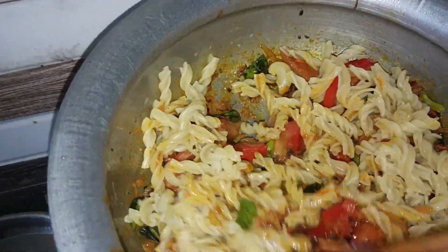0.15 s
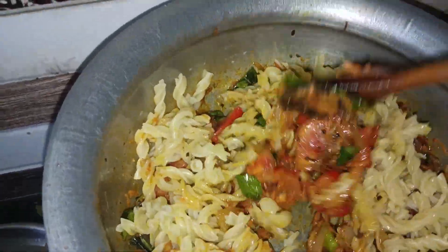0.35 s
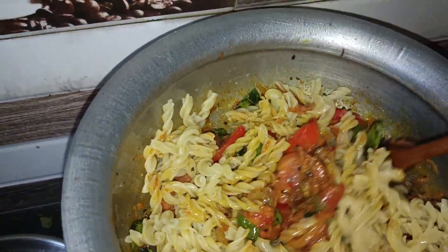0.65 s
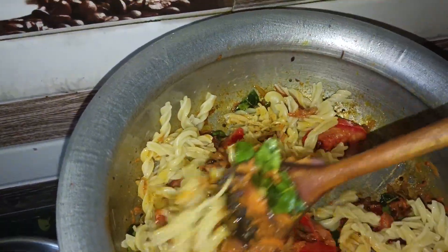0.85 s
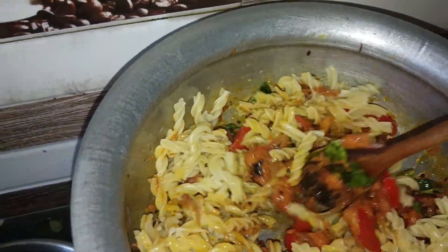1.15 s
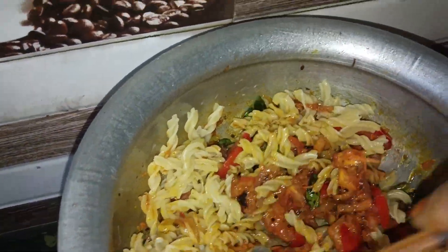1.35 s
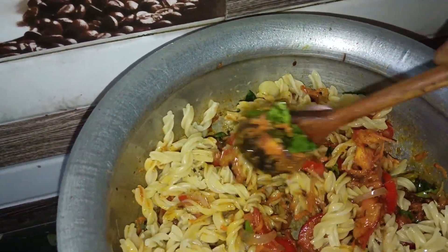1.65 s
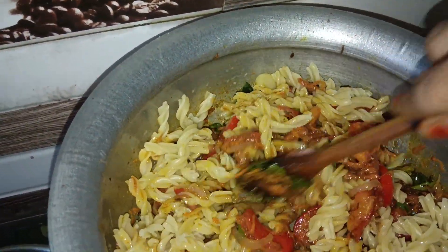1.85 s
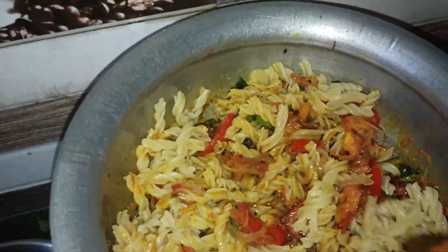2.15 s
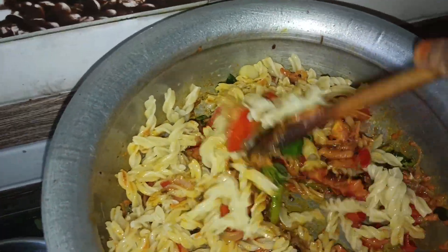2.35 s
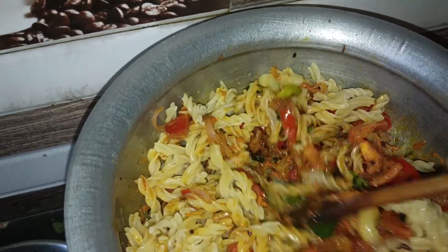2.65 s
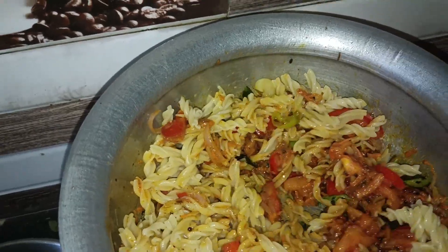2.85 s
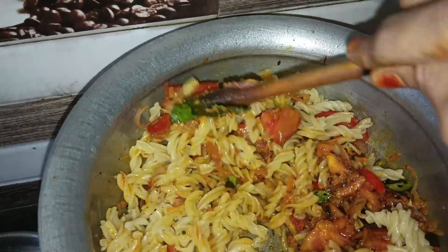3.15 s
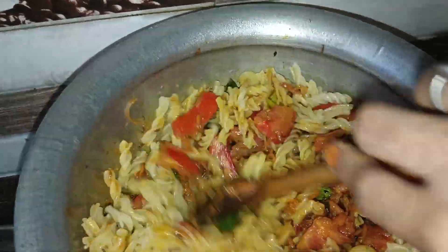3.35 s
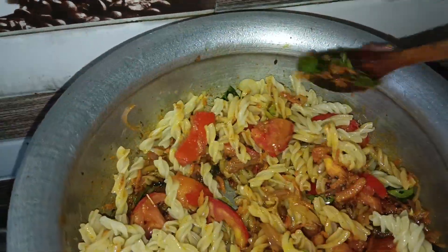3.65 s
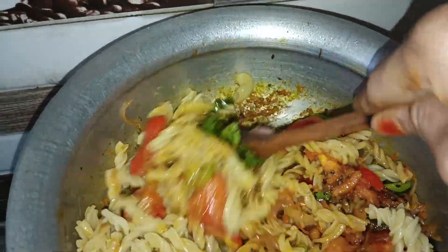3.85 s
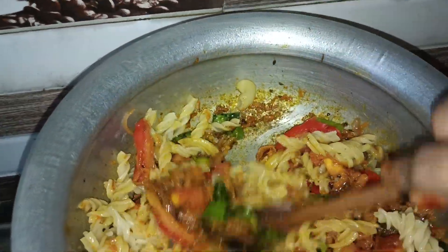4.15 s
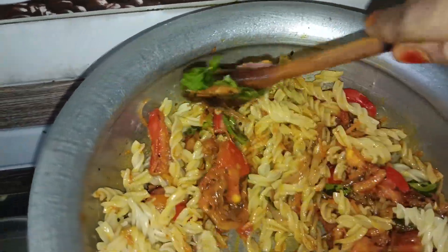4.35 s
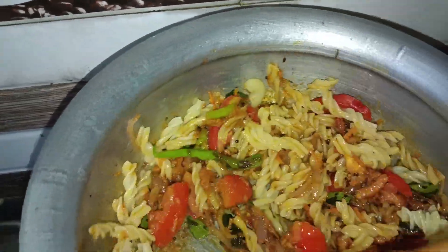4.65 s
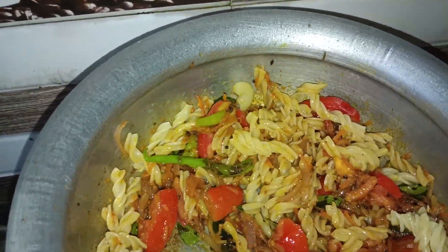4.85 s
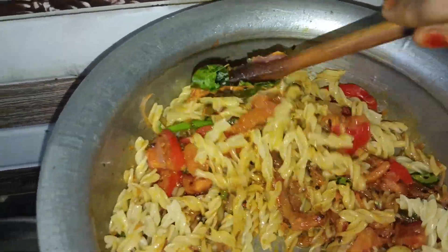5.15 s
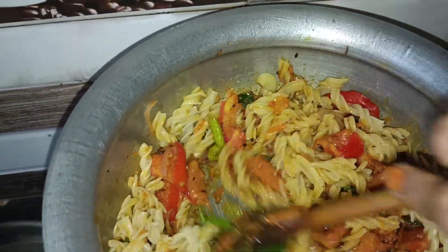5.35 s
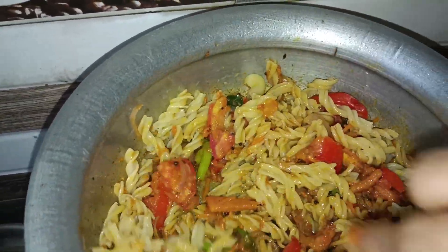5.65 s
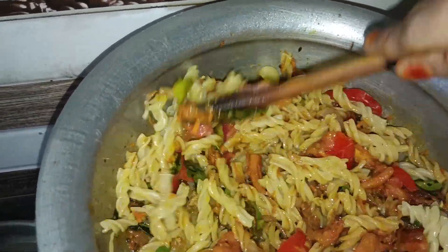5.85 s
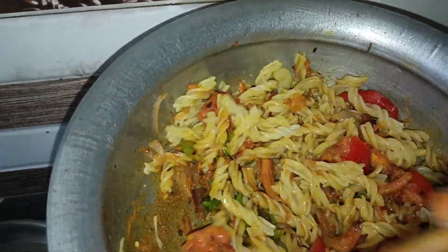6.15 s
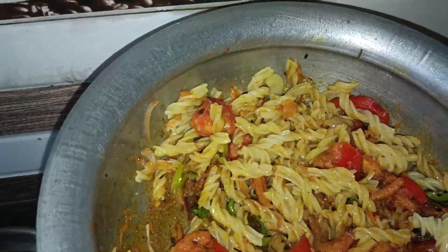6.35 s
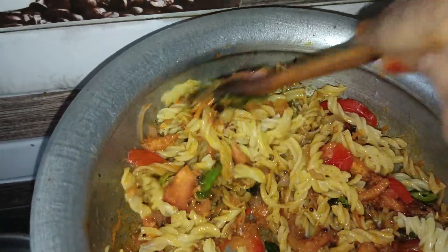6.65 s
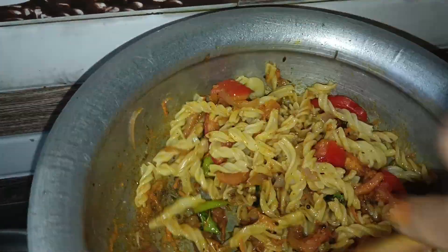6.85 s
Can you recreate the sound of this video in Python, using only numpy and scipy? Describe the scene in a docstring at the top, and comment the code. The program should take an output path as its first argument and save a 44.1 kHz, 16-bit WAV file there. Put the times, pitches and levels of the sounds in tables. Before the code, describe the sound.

Continuous bright, crackling sizzle fills a close stereo phone pickup, growing slightly as pasta is stirred in an aluminium pan. Short rough scrapes and dull, food-damped knocks follow the spoon's uneven rhythm, becoming firmer after the first second, some edged with a woody crack. One clear metallic ting sounds midway, towards the right. Low handling-like rumble rises late, over a very faint kitchen background.

```python
"""A wooden spoon stirs pasta in a wide aluminium pan on a stove, heard by a two-port phone held close.
From the start the spoon drags on the pan while fat and sauce sizzle and spit; each stroke swells the sizzle.
Soft knocks on the food-damped metal come first, then harder ones, some with a dry snap of wood.
Halfway through the spoon once strikes the bare rim. A low rumble comes and goes, mostly louder towards the end.
Noise and clicks make the sizzle and the drag; short fading tones make the knocks, snaps and rim."""
import sys
import numpy as np
from scipy import signal
from scipy.fft import rfft, irfft
from scipy.io import wavfile
from scipy.ndimage import uniform_filter1d

SR = 44100
rng = np.random.default_rng(int(sys.argv[2]) if len(sys.argv) > 2 else 0)


def master(y):
    """Save y as 16-bit WAV."""
    cut = np.clip(np.atleast_2d(y).T, -1, 1)
    pcm = np.round(cut * 32767)  # scale
    wavfile.write(sys.argv[1], SR, pcm.astype(np.int16))


N = 308700  # samples, 7 s
T = np.arange(N) / SR  # time in seconds
F = np.maximum(np.fft.rfftfreq(N, 1 / SR), 1)  # frequencies in Hz

# Tone colour of frying. Each row: frequency in Hz, relative strength in dB per Hz.
FRYING_COLOUR = [(600, -31), (1030, -11.5), (1150, -3.5), (1290, 2), (1700, -8), (1840, -4.5), (4020, -2),
                 (5440, -2.5), (6410, -9.5), (7550, -1.5), (8660, -5.5), (9400, -13.5), (10300, -8),
                 (11500, -20), (15800, -25.5)]
# Tones of the pan body under food. Each row: pitch in Hz, relative level in dB, time to fade by 60 dB in seconds.
PAN_MODES = [(159, 2, 0.12), (243, -13.5, 0.41), (261, -3, 0.45), (317.5, 12, 0.063), (337.2, 7, 0.14),
             (473, -0.5, 0.26), (575, 1.5, 0.024), (730.6, -9, 0.14), (769, 4, 0.024), (888, 1.5, 0.076),
             (982, 1, 0.027), (1110, -26, 0.0053), (1287, 8.5, 0.016), (1463, 3.5, 0.013)]


def undb(db):
    """Gain of a level in dB."""
    return 10 ** (np.asarray(db) / 20)


def unit(x):
    """Scale a sound to an rms of 1."""
    return x / np.sqrt(np.mean(x ** 2))


def over_hz(points):
    """Join points along a logarithmic frequency axis."""
    hz, value = np.transpose(points)
    return np.interp(np.log(F), np.log(hz), value)


def shape(x, gain):
    """Filter a sound by a gain for each frequency."""
    return irfft(rfft(x) * gain, N)


def ring(x, hz, t60):
    """One tone that x sets ringing; it fades by 60 dB in t60 seconds, or 5 ms if that is longer."""
    pole = np.exp(2j * np.pi * hz / SR - np.log(1000) / (max(t60, .005) * SR))
    return signal.lfilter([1], [1, -pole], x).imag


def walk(rate):
    """Random levels, each held for 1 / rate seconds, then smoothed and scaled to rms 1."""
    k = int(SR / rate)
    steps = np.repeat(rng.standard_normal(N // k + 1), k)
    smooth = uniform_filter1d(uniform_filter1d(steps, k), k)
    return unit(smooth[:N])


def clicks(rate, spread_db):
    """Random clicks, about `rate` a second: many small and a few large."""
    when, sign, size = rng.random(N), rng.standard_normal(N), rng.exponential(1, N)
    loudness = undb(spread_db * np.minimum(size, 4.5))
    return unit((when < rate / SR) * sign * loudness)


def pair(make, likeness):
    """Left and right sounds from two random draws, alike by the given correlation."""
    c = np.clip(likeness, 0, 1)
    mid = shape(make(), np.sqrt(1 + c))
    side = shape(make(), np.sqrt(1 - c))
    return np.array([mid + side, mid - side]) / 2


def aside(x, lag_s, left_db=0):
    """Two channels of a sound from another direction: the left one shifted in time and level."""
    delay = np.exp(-2j * np.pi * F * np.array([[lag_s], [0]]))
    return shape(x, undb([[left_db], [0]]) * delay)


def kitchen():
    """The faint background of the room is steady noise, much alike on both sides."""
    # Each row: frequency in Hz, relative strength in dB per Hz.
    room_colour = [(25, 5), (45, -20), (85, 13), (170, -4), (400, -4), (900, -23), (1300, -38)]
    air = pair(lambda: rng.standard_normal(N), 0.74)
    return undb(-66) * unit(shape(air, undb(over_hz(room_colour))))


def rumble():
    """Noise rings in low narrow resonances, and its level comes and goes."""
    # Each row: time in seconds, level in dB.
    rumble_levels = [(0.0, -76.5), (0.11, -87), (0.21, -50), (0.54, -71), (1.38, -46.5), (2.46, -69),
                     (3.67, -66), (3.76, -52), (4.42, -46.5), (4.52, -71), (4.6, -39), (4.74, -51),
                     (5.52, -41), (5.54, -37.5), (6.1, -39.5), (6.71, -59.5), (6.76, -43), (7.0, -41)]
    # Each row: pitch in Hz, relative level in dB, time to fade by 60 dB in seconds.
    low_modes = [(72.3, -3, 0.53), (93.3, -4, 0.25), (115.4, -20.5, .2)]
    hum = sum(undb(db) * unit(ring(rng.standard_normal(N), hz, t60)) for hz, db, t60 in low_modes)
    hum = shape(hum, 1 / ((1 + (55 / F) ** 6) * (1 + (F / 130) ** 6)))  # keep about 55 to 130 Hz
    s, level_db = np.transpose(rumble_levels)
    return undb(np.interp(T, s, level_db)) * unit(hum)


def swell():
    """Each stroke bares the hot floor: extra dB of sizzle ramp up to its peak and down again."""
    # Each row: time of the peak in seconds, rise in seconds, fall in seconds (both at least 0.02), swell in dB.
    stroke_swells = [(0.25, 0.42, 0.26, 6), (0.68, 0.33, .16, 5.5), (1.18, 0.39, 0.097, 6.5),
                     (1.53, 0.27, 0.24, 5.5), (1.8, 0.064, 0.9, 1), (2.25, 0.042, 0.18, 5),
                     (2.67, .24, 0.17, 6.5), (2.96, 0.042, 0.21, 4), (3.44, 0.22, 0.087, 5),
                     (3.84, 0.23, 0.077, 4.5), (4.19, 0.16, 0.28, 6.5), (4.662, 0.29, 0.2, 5),
                     (4.94, 0.08, .28, 6.5), (5.37, 0.22, 0.12, 6.5), (6.05, 1, 0.53, 3),
                     (6.45, 0.23, 0.14, 7), (6.83, 0.28, .17, 5)]
    s, rise, fall, db = np.transpose(stroke_swells)[:, :, None]
    ramp = 1 - np.where(T < s, (s - T) / np.maximum(rise, .02), (T - s) / np.maximum(fall, .02))
    return np.max(db * np.clip(ramp, 0, 1), axis=0)  # where strokes overlap, the larger wins


def sizzle():
    """Steam bubbles burst densely, the sharpest ones bright; separate bands of pitch flicker on their own."""
    # Each row: frequency in Hz, left-right correlation.
    ear_likeness = [(300, .9), (1000, 0.48), (3000, 0.15)]
    extra_db = swell()
    level_db = -30.5 + 0.3846 * T + extra_db  # grows by 0.3846 dB a second as the food is spread
    fizz_db = -41 + 1.85 * extra_db  # the low fizz swells 1.85 times as far in dB
    bright = F / (F + 12000)

    def bubbles():
        """Noise for the many small bubbles, clicks for the sharp ones."""
        return rng.standard_normal(N) + shape(1.13 * clicks(900, spread_db=5.5), bright)

    pops = shape(pair(bubbles, over_hz(ear_likeness)), undb(over_hz(FRYING_COLOUR)))
    edges = [1, 2200, 3600, 6200, 9400, SR]  # Hz
    shared = walk(18)
    bands = []
    for low_hz, high_hz in zip(edges, edges[1:]):
        flicker_db = 0.57 * shared + 1.18 * walk(30)
        bands.append(shape(pops, (F >= low_hz) & (F < high_hz)) * undb(flicker_db))
    return unit(sum(bands[1:])) * undb(level_db) + unit(bands[0]) * undb(fizz_db)


def spits():
    """Each spit of fat is a millisecond burst of bright noise, strongest where the ports resonate."""
    # The loudest spits. Each row: start in seconds, peak level in dB before colouring.
    fat_spits = [(0.1454, -19), (0.16, -11), (0.2104, -8), (0.7941, -9), (0.806, -7), (0.819, -8.5),
                 (0.8794, -13), (1.1674, -26), (1.2979, -11), (1.642, -6), (1.905, -8), (2.025, -8),
                 (2.424, -9.5), (3.0714, -21), (3.1253, -28), (3.34, -4), (3.826, -6), (3.8856, -20),
                 (4.2963, -7.5), (4.662, -4), (4.778, -7), (5.2714, -23), (5.972, -5)]
    length = 300  # samples
    out, t = np.zeros((2, N + length)), np.arange(length) / SR
    for (s, peak_db), noise in zip(fat_spits, rng.standard_normal((len(fat_spits), 2, length))):
        burst = noise * t * np.exp(-t / 0.00063)
        peak = np.sqrt(np.max(np.mean(burst ** 2, axis=0)))
        start = int(s * SR)
        out[:, start:start + length] += undb(peak_db) * burst / peak
    colour = undb(0.74 * over_hz(FRYING_COLOUR) + 4.5)
    return shape(out[:, :N], colour / np.sqrt(1 + (6500 / F) ** 8))  # mostly above 6500 Hz


def contact(column, fade_db_per_s):
    """How loudly the spoon drags: each drag rises, holds, then fades faster and faster as the spoon lifts."""
    # Each row: time of full contact in seconds, rise in seconds (at least 0.003), hold in seconds,
    # level of the low tones in dB, level of the middle tones in dB.
    spoon_drags = [(0.0, .01, 0.047, -42.5, -42), (.269, 0.039, 0.0033, -61, -36),
                   (0.335, 0.0037, 0.031, -44, -47), (0.529, .008, 0.074, -45, -45),
                   (0.686, 0.023, 0.0024, -40.5, -34.5), (1.044, 0.022, 0.029, -41.5, -38),
                   (1.164, .008, 0.062, -45, -35), (1.211, 0.12, 0.022, -31, -33),
                   (1.448, 0.019, 0.036, -32.5, -30.5), (1.804, 0.013, 0.072, -30.5, -34),
                   (2.194, 0.014, 0.034, -31.5, -24.5), (2.439, .1, 0.0069, -55, -50.5),
                   (2.703, 0.11, 0, -30, -29.5), (2.96, 0.082, 0.073, -78, -55),
                   (3.043, .02, 0.062, -62, -49.5), (3.293, .008, 0.072, -50, -45),
                   (3.437, 0.019, 0.041, -32.5, -31), (3.657, 0.0097, 0.0041, -34, -28.5),
                   (3.856, 0.41, 0, -43.5, -42.5), (4.294, 0.01, 0.036, -40, -42.5),
                   (4.588, 0.01, 0.085, -30, -32.5), (4.919, 0.0073, 0.051, -43, -37),
                   (5.001, 0.068, 0.085, -41.5, -45), (5.268, .008, 0.037, -39, -45),
                   (5.32, 0.084, 0, -38, -36), (5.396, .008, 0.073, -32, -31.5), (5.62, 0.24, 0, -33, -36),
                   (5.865, 0.18, 0, -39.5, -36.5), (6.047, 0.0073, 0.071, -28, -31.5),
                   (6.412, 0.0073, 0.013, -29.5, -44), (6.477, 0.14, 0.017, -32, -32.5),
                   (6.74, 0.024, 0.025, -30.5, -31.5), (6.847, 0.11, 0.046, -28.5, -31.5)]
    rise_db, lift_db_per_s2 = 30, 605
    power = np.zeros(N)
    for s, rise, hold, *db in spoon_drags:
        near = np.abs(T - s) < .5
        early = np.maximum(s - T[near], 0)
        late = np.maximum(T[near] - s - max(hold, 0), 0)
        loss_db = rise_db * early / max(rise, .003) + fade_db_per_s * late + lift_db_per_s2 * late ** 2
        power[near] += undb(db[column] - loss_db) ** 2
    return np.sqrt(power)


def even(x):
    """The hand's steady pressure evens out slow swings in level."""
    return unit(x / uniform_filter1d(x ** 2, int(.03 * SR)) ** .35)


def drag():
    """The spoon sticks and slips: clicks in uneven runs set the pan's own tones ringing."""
    slips = clicks(1500, spread_db=2.0) * undb(2.2 * walk(40))
    low = sum(undb(db) * ring(slips, hz, t60) for hz, db, t60 in PAN_MODES if hz < 540)
    # the middle tones fade sooner under the spoon than the table says
    middle = sum(undb(db) * ring(slips, hz, 0.63 * t60) for hz, db, t60 in PAN_MODES if 540 < hz < 1130)
    low = shape(low, 1 / (1 + (F / 560) ** 6))
    middle = shape(middle, 1 / (1 + (540 / F) ** 6))
    return even(low) * contact(0, fade_db_per_s=175) + even(middle) * contact(1, fade_db_per_s=226)


def strike(s, peak_db, modes):
    """A blow's tones start together, build within a fraction of a cycle and fade each at its own rate."""
    t = np.arange(int(.4 * SR)) / SR
    hz, db, t60 = np.transpose(modes)[:, :, None]
    rise = (1 - np.exp(-t * hz / 0.22)) ** 2
    fade = undb(db - 60 * t / np.clip(t60, .0005, .6))
    blow = np.sum(rise * fade * np.sin(2 * np.pi * hz * t), axis=0)
    return np.pad(blow * undb(peak_db) / np.abs(blow).max(), (int(s * SR), N))[:N]


def knocks():
    """Spoon on pan: where and how hard a blow lands sets its mix of low, middle and upper tones."""
    # Each row: start in seconds, then peak levels in dB of the low, middle and upper tones before filtering.
    spoon_knocks = [(0.328, -38.5, -54, -55), (0.5, -30, -53, -55), (0.688, -32.5, -40, -55),
                    (1.165, -24.5, -34, -50), (1.1779, -35, -34, -10), (1.197, -20.5, -18, -24),
                    (1.4442, -31, -11.5, -22), (1.8043, -14, -14.5, -11.5), (2.191, -24.5, -6.5, -35),
                    (2.6739, -33, -44, -13), (3.279, -43, -24.5, -34), (3.435, -21, -23, -23),
                    (3.656, -25, -13, -12.5), (3.701, -24.5, -46, -53), (4.307, -58, -50, -50),
                    (4.5998, -21, -17, -20), (4.6382, -32, -15, -15.5), (4.9123, -23.5, -14, -28),
                    (5.267, -38, -49, -34), (5.392, -20.5, -37, -21), (5.4618, -22, -34, -13),
                    (5.6128, -34, -36, -16.5), (6.04, -14, -17, -16), (6.059, -15, -12, -18),
                    (6.397, -18, -46, -32), (6.738, -18, -33, -41), (6.8237, -38, -13.5, -33),
                    (6.842, -17, -30, -45)]
    out, hz = np.zeros(N), np.transpose(PAN_MODES)[0]
    groups = [hz < 540, (hz >= 540) & (hz < 1130), hz >= 1130]
    chance = rng.standard_normal((len(spoon_knocks), 2, len(PAN_MODES)))
    for (s, *group_db), (place, load) in zip(spoon_knocks, chance):
        modes = np.array(PAN_MODES)
        modes[:, 0] *= 1 + 0.028 * load  # the food lies differently each time and shifts the pitches
        modes[:, 1] += 4.5 * place  # dB; the place of the blow favours some tones
        for group, peak_db in zip(groups, group_db):
            out += strike(s, peak_db, modes[group])
    return out


def cracks():
    """Dry snaps of wood in hard knocks: a pull and a push that die within a few cycles, with a brighter edge."""
    # Each row: start in seconds, peak level in dB, pitch in Hz.
    wood_snaps = [(1.1774, -11, 3600), (1.1971, -6.5, 3900), (1.4446, -18, 1480), (1.8046, -5, 1194),
                  (2.1918, -20, 1040), (2.6747, -17, 2600), (4.601, -13, 2010), (4.6362, -13, 2220),
                  (4.9129, -29, 1600), (5.46, -23, 1300), (6.040, -25, 1700)]
    cycles = 4.5  # cycles to fade by 60 dB
    out = np.zeros(N)
    for s, peak_db, hz in wood_snaps:
        body = (hz, 0, cycles / hz)
        edge = (2.4 * hz, -3, cycles / hz / 2)
        out -= strike(s, peak_db, [body, edge])
    return aside(out, lag_s=-.00009)  # reaches the left port a little sooner than the pan floor's sound


def rim():
    """One blow on the bare rim rings high and clear, on the right."""
    # Each row: pitch in Hz, relative level in dB, time to fade by 60 dB in seconds.
    rim_modes = [(1890, -4, .05), (2281, 4, .09), (2362, -5, .05), (3690, 3, 0.16), (3816, -8, 0.09),
                 (4558, -12, .09), (4793, -9, .11), (5157, -7, .13)]
    blow = strike(3.6548, -2.5, rim_modes)
    return aside(blow, lag_s=.00008, left_db=-5)  # later and weaker at the left port


def reflections(pan):
    """Close reflections: a short fading noise tail that reaches the two ports in opposite sign."""
    tail = rng.standard_normal(4000) * np.exp(-np.arange(4000) / SR / 0.015)
    tail = tail / np.sqrt(np.sum(tail ** 2))
    wet = shape(signal.fftconvolve(pan, tail)[:N], F ** 2 / (F ** 2 + 450 ** 2))  # weak below 450 Hz
    return undb(-0.5) * wet * np.array([[1], [-1]])


def scene():
    """Add all the sounds; the pan radiates little below its lowest tones."""
    pan = shape(knocks() + drag(), 1 / np.sqrt(1 + (180 / F) ** 8)) + rumble()
    spoon = pan + cracks() + rim() + reflections(pan)
    return spoon + sizzle() + spits() + kitchen()


def record(dry):
    """Ports differ in colour and the left is further off; gain control dips after loud sound; the top is cut."""
    # Each row: frequency in Hz, left minus right level in dB.
    port_balance = [(90, 0), (180, -3), (330, 0), (700, -2.5), (2500, -1.5), (5600, 0), (7500, 4.5),
                    (9200, 2), (11300, -9.5), (15000, -6)]
    half = over_hz(port_balance) / 2
    lag = np.exp(-2j * np.pi * F * np.array([[.00014], [0]]))  # seconds, left and right
    x = shape(dry, lag * undb(np.array([half, -half])))
    keep = np.exp(-1 / (0.042 * SR))  # the loudness meter forgets over 0.042 s
    loud = np.sqrt(signal.lfilter([1 - keep], [1, -keep], np.mean(x ** 2, axis=0)))
    x = x * np.minimum(1, undb(-36.5) / (loud + 1e-9)) ** 0.15  # turn down gently above -36.5 dB
    top_cut = signal.ellip(14, .2, 90, 15950, fs=SR, output="sos")  # steep cut above 15950 Hz
    return signal.sosfilt(top_cut, x)


dry = scene()
out = record(dry)
master(out)
```